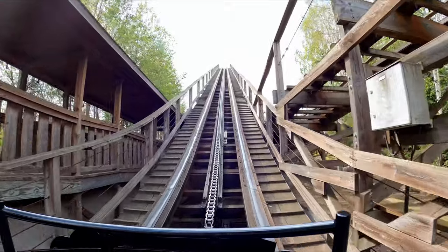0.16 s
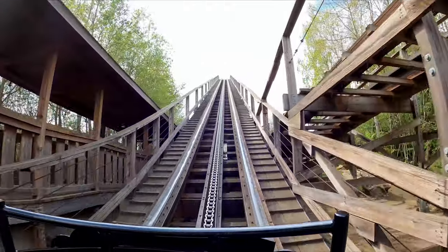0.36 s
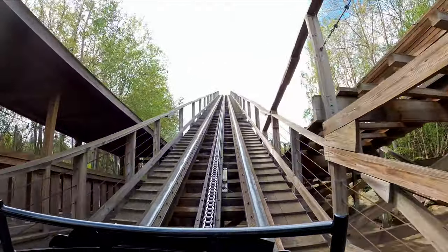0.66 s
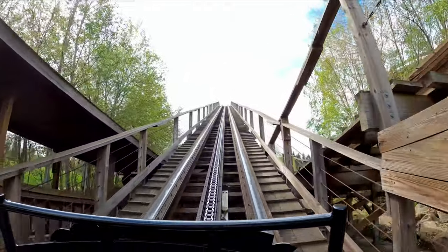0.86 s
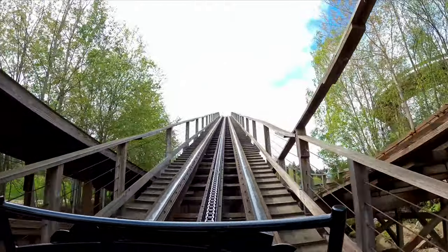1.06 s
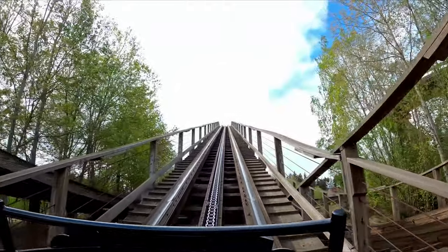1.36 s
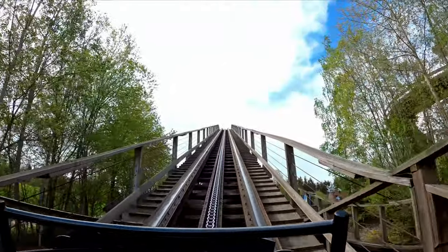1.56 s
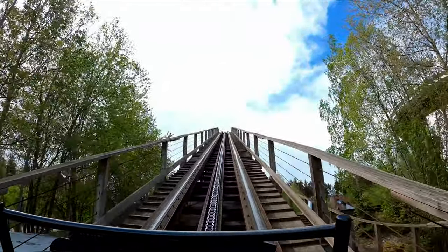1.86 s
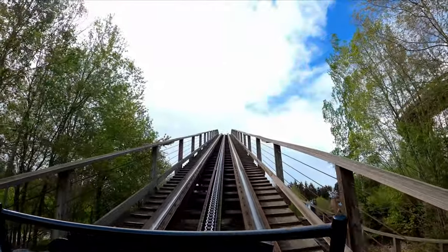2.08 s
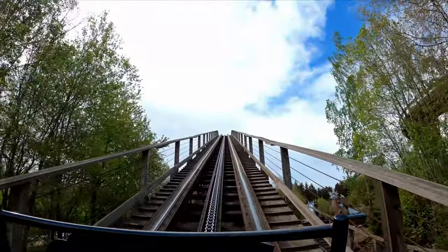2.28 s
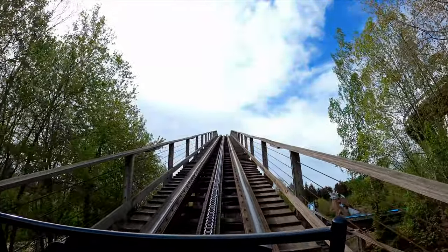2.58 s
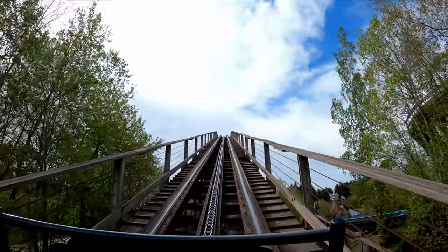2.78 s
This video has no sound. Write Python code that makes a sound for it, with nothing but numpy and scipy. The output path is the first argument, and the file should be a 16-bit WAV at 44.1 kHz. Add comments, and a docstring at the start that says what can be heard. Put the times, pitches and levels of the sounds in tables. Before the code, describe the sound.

Onboard coaster ride: low wheel rumble and light rattling, then loud metallic ratchet clatter while climbing.

```python
"""Wooden coaster, front car onto the lift hill

The microphone rides the front car out of the station. Steel wheels rumble through the timber (filtered
noise) and thump over rail joints (decaying sines); loose fittings rattle (struck modes) and clink (short
sines). On the hill the safety dog under the car drags and clacks over its toothed rack (struck modes),
faster at first, then slowing."""
import sys
import numpy as np
from scipy import signal
from scipy.fft import rfft, irfft
from scipy.io import wavfile
from scipy.ndimage import uniform_filter1d, minimum_filter1d

SR = 44100
rng = np.random.default_rng(int(sys.argv[2]) if len(sys.argv) > 2 else 0)


def ratio_of_db(decibels):
    """Turn decibels (scalar or array-like) into linear amplitude factors; 0 dB maps to 1."""
    return 10 ** (np.asarray(decibels, float) / 20)


def materialize(psi):
    """Save the field psi as 16-bit PCM at rate SR to the path in sys.argv[1].

    A 1-D psi becomes a single channel; in a 2-D psi each row is a channel.
    """
    bounded = np.clip(np.atleast_2d(psi).T, -1, 1)
    quanta = np.round(bounded * 32767).astype(np.int16)
    wavfile.write(sys.argv[1], SR, quanta)


N = 129213


def level(x, db=0):
    """Set the rms level."""
    return x * ratio_of_db(db) / np.sqrt(np.mean(x ** 2))


def curve(rows):
    """A (s, dB) table as gain per sample."""
    rows = np.array(rows)
    return ratio_of_db(np.interp(np.arange(N) / SR, rows[:, 0], rows[:, 1]))


def colour(x, points):
    """Causal filter with the given (Hz, dB) gain, minimum phase from the folded cepstrum."""
    p, size = np.array(points), 8192
    hz = np.maximum(np.arange(size // 2 + 1) * SR / size, 1)
    gain_db = np.interp(np.log(hz), np.log(p[:, 0]), p[:, 1])
    cepstrum = irfft(gain_db * np.log(10) / 20)
    # fold the negative times onto the positive ones
    cepstrum[1:size // 2] *= 2
    cepstrum[size // 2 + 1:] = 0
    impulse = irfft(np.exp(rfft(cepstrum)))
    return signal.fftconvolve(x, impulse)[:N]


def ring(x, hz, width_hz):
    """One resonance, gain 1 at its centre."""
    return signal.lfilter(*signal.iirpeak(hz, hz / width_hz, fs=SR), x)


def walk(rate):
    """Random levels held 1 / rate s and slewed twice; spread near 1."""
    k = int(SR / rate)
    steps = np.repeat(rng.standard_normal(N // k + 1), k)
    return 1.3 * uniform_filter1d(uniform_filter1d(steps, k), k)[:N]


def burst(start_s, db, rise_s, t60_s):
    """Envelope of one blow: quick rise, exponential fall."""
    age = np.maximum(np.arange(N) / SR - start_s, 0)
    return ratio_of_db(db - 60 * age / t60_s) * (1 - np.exp(-age / rise_s))


def grit(spread_db):
    """Dense tiny contacts of uneven size."""
    size_db = spread_db * rng.exponential(size=N) / 2
    return level(rng.standard_normal(N) * ratio_of_db(size_db))


def struck(force, sharp, modes, points, spread_db):
    """Gritty contacts drive an object: force below the treble edge, sharp above; knocks ring each mode."""
    treble_hz, knock_spread_db = 4800, 6.5
    low_pass = signal.butter(4, treble_hz, "low", fs=SR, output="sos")
    high_pass = signal.butter(4, treble_hz, "high", fs=SR, output="sos")
    contact = signal.sosfilt(low_pass, grit(spread_db) * force)
    contact = contact + signal.sosfilt(high_pass, grit(spread_db) * sharp)
    rings = 0
    for hz, width_hz, db in modes:
        # each mode gets sparser knocks of its own, and a wavering level
        mode_gain = ratio_of_db(db + 2.42 * walk(22.13))
        knocks = grit(knock_spread_db) * (force if hz < treble_hz else sharp)
        rings = rings + mode_gain * ring(knocks, hz, width_hz)
    # the colour sets the balance only, not the overall level
    return colour(contact + rings, points) / np.std(colour(grit(0), points))


def wheels():
    """Rolling noise excites timber and car floor; the frame shudders and each rail joint thumps low."""
    # wheel rumble over the ride [t/s, level/dB]
    roll_level = [(0.0, -14), (0.53, -15.5), (1.02, -13.5), (1.07, -17), (1.2, -12), (1.35, -15.5),
                  (1.97, -16), (2.56, -16.5), (2.76, -16), (2.9, -16)]
    # colour of the rumble [f/Hz, relative gain/dB]
    roll_colour = [(35, -39), (60, -13.5), (90, -1), (180, 0.5), (300, -1), (600, -8.5), (1100, -12),
                   (1900, -25), (3000, -31.5), (4200, -38), (5000, -44), (7000, -56), (10000, -65),
                   (14000, -95)]
    # timber and car floor resonances, ahead of the colour [f/Hz, width/Hz, level/dB]
    timber = [(88, 29, -4.5), (176, 15.5, -13), (230.3, 15, -7.5), (285, 7.4, 0.5), (376, 41, -20.5)]
    # deep shudder of the frame over the ride [t/s, level/dB]
    shudder_level = [(0.0, -22), (1.35, -21.5), (1.65, -23), (2.3, -19.5), (2.42, -33.5), (2.9, -24)]
    # thumps at the rail joints [t/s, level/dB, f/Hz]
    joints = [(.16, -11, 348), (.06, -8, 88), (.21, -7, 89.5), (0.431, -10.5, 88), (.52, -14.5, 98),
              (.62, -22, 251), (.72, -9, 300.7), (.88, -11, 176), (.93, -13, 139), (.94, -10, 282.7),
              (1.0, -14, 176), (1.17, -13, 168), (1.59, -12, 285), (1.755, -19, 548), (1.8, -11.5, 240.3),
              (1.87, -9, 118), (1.91, -9.5, 285.2), (2.61, -9, 165.3), (2.72, -7, 174.7),
              (2.725, -8, 225.6)]
    shudder_hz, shudder_width_hz = 45, 100
    thump_t60_s, thump_rise_s = 0.25, 0.0086

    noise = rng.standard_normal(N)
    resonances = sum(ratio_of_db(db + 0.73 * walk(5.4)) * ring(noise, hz, w) for hz, w, db in timber)
    body = colour(noise + resonances, roll_colour)
    rumble = level(body, -1.84) * curve(roll_level) * ratio_of_db(0.75 * walk(15))

    shudder = rng.standard_normal(N)
    for width_hz in (2 * shudder_width_hz, shudder_width_hz, shudder_width_hz):
        shudder = ring(shudder, shudder_hz, width_hz)
    shudder = level(shudder) * curve(shudder_level)

    t = np.arange(N) / SR
    thumps = sum(burst(s, db, thump_rise_s, thump_t60_s) * np.sin(2 * np.pi * hz * (t - s))
                 for s, db, hz in joints)
    return rumble + shudder + thumps


def fittings():
    """Each jolt shakes loose fittings: a short burst of contacts rings their metal modes."""
    # jolts, before the offsets below [t/s, level/dB, treble level/dB]
    jolts = [(0.0254, -18.5, -29.5), (0.063, -28, -52), (0.1815, -26.5, -57), (0.2194, -31, -45),
             (0.2553, -20.5, -36.5), (0.2994, -23, -46), (0.3414, -23.5, -39), (0.377, -24, -37),
             (0.4194, -26, -38.5), (0.4587, -19.5, -40), (0.501, -25.5, -50), (0.536, -19, -36.5),
             (0.58, -24.5, -49), (0.615, -23, -38), (0.6659, -22, -40), (0.699, -28, -42),
             (0.7285, -18, -43.5), (0.79, -26.5, -43), (0.852, -23.5, -54.5), (0.911, -27, -47),
             (0.9445, -24.5, -42), (1.083, -26.5, -56), (1.178, -18.5, -44), (1.2294, -37, -55),
             (1.258, -18.5, -62), (1.39, -37, -49)]
    # colour of the rattle [f/Hz, relative gain/dB]
    rattle_colour = [(600, -26), (1200, 14.5), (2000, 1), (3000, 0.5), (3900, -2.5), (4700, -13),
                     (5500, -18.5), (7000, -29), (9000, -36), (11000, -44), (15000, -60)]
    # modes of the fittings, over the broad colour [f/Hz, width/Hz, level/dB]
    fitting_modes = [(2150, 87, 7), (3910, 350, 0.5), (5100, 120, -0.5)]
    offset_db, treble_offset_db = -7.5, 18.5
    rise_s, t60_s = 0.0038, 0.22
    force = sum(burst(s, db + offset_db, rise_s, t60_s) for s, db, _ in jolts)
    sharp = sum(burst(s, db + treble_offset_db, rise_s, t60_s) for s, _, db in jolts)
    return struck(force, sharp, fitting_modes, rattle_colour, spread_db=3.0)


def pings():
    """Single metal parts ring out: short decaying sines, slightly unsteady in phase and level."""
    # ringing parts [t/s, level/dB, f/Hz, t60/s]
    metal_parts = [(0.031, -29, 3840, 0.061), (0.101, -32, 2320, 0.042), (.258, -27.5, 3900, 0.083),
                   (.54, -32, 2145, 0.11), (.618, -34, 5080, 0.15), (.628, -32, 3450, 0.19),
                   (.667, -36, 2150, .2), (0.954, -18.5, 2670, 0.034), (.997, -37, 4000, 0.046),
                   (1.262, -21, 1727, 0.076), (1.418, -18, 1480, .07), (1.419, -20, 1990, 0.07),
                   (1.445, -22.5, 3050, 0.12), (1.505, -37, 6350, 0.098), (1.522, -21, 3030, 0.089),
                   (1.553, -40, 6300, 0.086), (1.708, -32, 6180, 0.08), (1.764, -40, 6400, .08),
                   (2.074, -9.5, 1565, .05), (2.325, -37, 6000, .1), (2.415, -41, 6040, 0.11),
                   (2.73, -9.5, 1387, 0.074), (2.753, -18, 3190, 0.044), (2.809, -10.5, 1187, 0.11),
                   (2.818, -33, 6100, 0.063), (2.862, -17.5, 1940, 0.068)]
    t = np.arange(N) / SR
    waver = 2.2 * walk(250)  # radians
    flicker = ratio_of_db(0.63 * walk(150))
    return flicker * sum(burst(s, db, 0.0018, t60) * np.sin(2 * np.pi * hz * t + waver)
                         for s, db, hz, t60 in metal_parts)


def safety_dog():
    """Clacks of the dog dropping onto teeth, and its slowly fading drag, shake the same steel."""
    # drops onto a tooth, before the offsets below [t/s, level/dB, treble level/dB]
    clacks = [(1.417, -2.5, -38), (1.451, -27, -41), (1.493, -5, -30), (1.5209, -5.5, -38),
              (1.5504, -8.5, -35.5), (1.577, -16, -50), (1.627, -3.5, -25.5), (1.653, -5, -38),
              (1.678, -9.5, -46), (1.709, -4.5, -30), (1.7407, -9.5, -33), (1.766, -3.5, -35),
              (1.8145, -7.5, -34), (1.8394, -9, -38), (1.8634, -7, -40), (1.9085, -7, -44),
              (1.9545, -3, -39), (2.0037, -4, -37), (2.038, -10, -39), (2.074, -8, -41), (2.108, -5, -41),
              (2.1604, -10, -41), (2.1804, -6, -33.5), (2.208, -7, -47), (2.252, -8, -32),
              (2.2997, -4, -39.5), (2.3305, -9, -36), (2.359, -14, -59), (2.401, -11, -34),
              (2.414, -9, -41), (2.4427, -12, -48), (2.4987, -3.5, -34), (2.548, -7, -34),
              (2.596, -6, -30.5), (2.6394, -12.5, -42), (2.6794, -21, -43.5), (2.7065, -9, -44),
              (2.7287, -21, -53), (2.798, -10.5, -43), (2.8114, -27, -40), (2.8576, -11.5, -65)]
    # colour of dog and rack [f/Hz, relative gain/dB]
    dog_colour = [(300, -11), (600, -6.5), (1000, 1), (1500, 2), (2000, -2.5), (2300, -7), (3200, -11.5),
                  (3700, -18), (4400, -19), (4800, -29.5), (5600, -31.5), (6600, -34.5), (7400, -40),
                  (9000, -45.5), (11500, -55.5), (14000, -64), (16000, -84)]
    # modes of dog and rack, over the broad colour [f/Hz, width/Hz, level/dB]
    dog_modes = [(1394, 33, 3.5), (1617, 43, -2), (1906, 35, 4.5), (2140, 33, 2), (2523, 27, 1.5),
                 (2830, 50, 3.5), (3260, 53, 2.5), (4250, 310, -3.5), (6000, 340, 0.5), (6350, 130, 4.5),
                 (8120, 170, 3)]
    offset_db, treble_offset_db = -15.5, 21
    rise_s, treble_rise_s, t60_s = 0.0017, 0.0095, 0.16
    drag_start_s, drag_db, drag_fade_db_per_s = 1.425, -30, -1.5

    age = np.arange(N) / SR - drag_start_s
    drag = (age > 0) * ratio_of_db(drag_db + drag_fade_db_per_s * age)
    force = drag * ratio_of_db(2.4 * walk(20))
    force = force + sum(burst(s, db + offset_db, rise_s, t60_s) for s, db, _ in clacks)
    sharp = drag * ratio_of_db(9.5 + 2.05 * walk(45))
    sharp = sharp + sum(burst(s, db + treble_offset_db, treble_rise_s, t60_s) for s, _, db in clacks)
    return struck(force, sharp, dog_modes, dog_colour, spread_db=4.0)


def scene():
    """All sources, heard from on board, in one channel."""
    return (wheels() + fittings() + pings() + safety_dog())[None, :]


def roll_off(x):
    """The treble ends steeply here."""
    return signal.sosfilt(signal.butter(12, 15330, fs=SR, output="sos"), x)


def record(dry):
    """A fast limiter at the microphone turns down the peaks."""
    limit, smooth_s = 0.72, 0.0029  # limit is a share of full scale
    k = int(smooth_s * SR)
    needed_gain = limit / np.maximum(np.abs(dry), limit)
    gain = uniform_filter1d(minimum_filter1d(needed_gain, k), k)
    return roll_off(dry * gain)


dry = scene()
out = record(dry)
materialize(out)
```